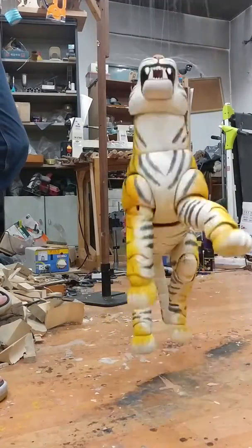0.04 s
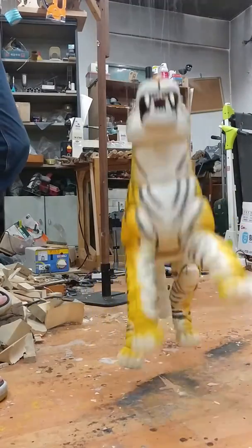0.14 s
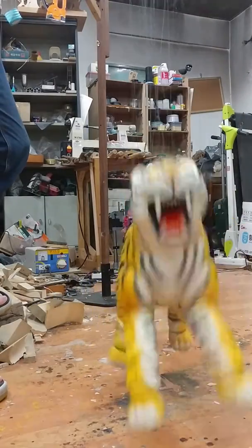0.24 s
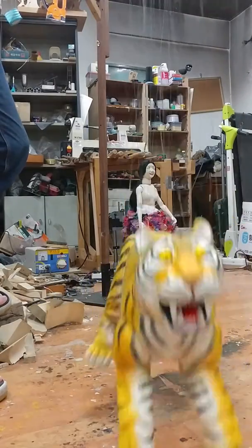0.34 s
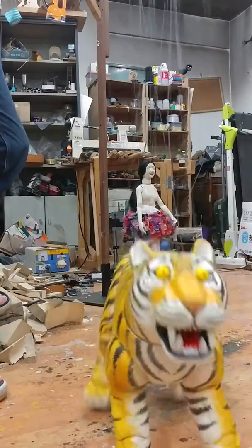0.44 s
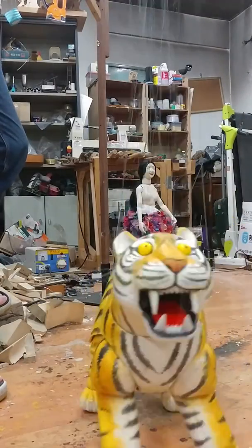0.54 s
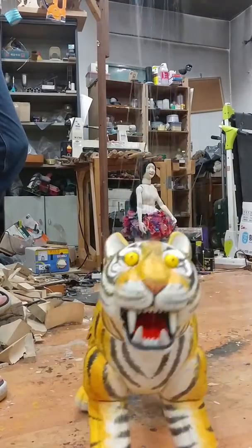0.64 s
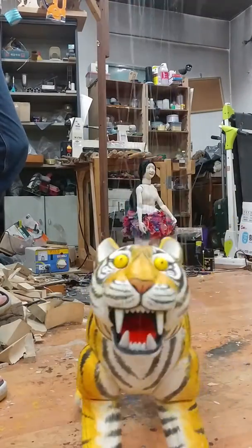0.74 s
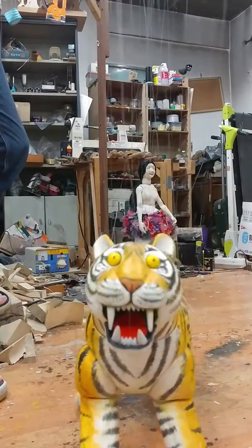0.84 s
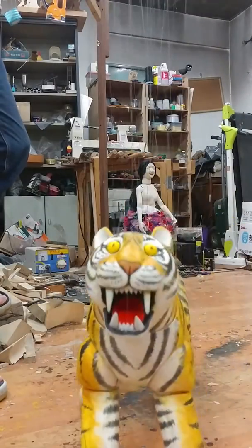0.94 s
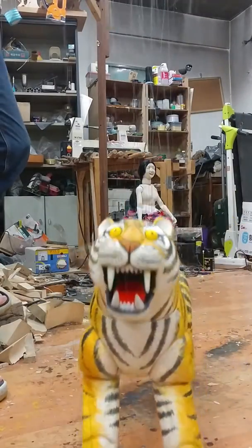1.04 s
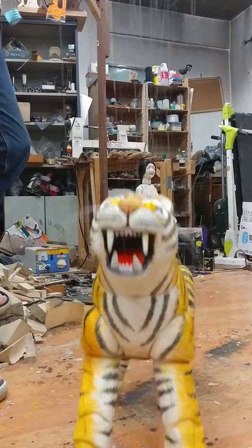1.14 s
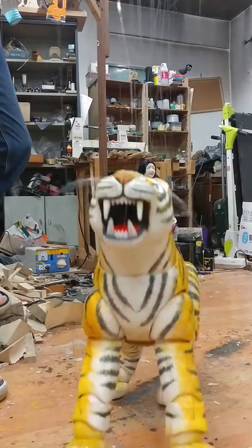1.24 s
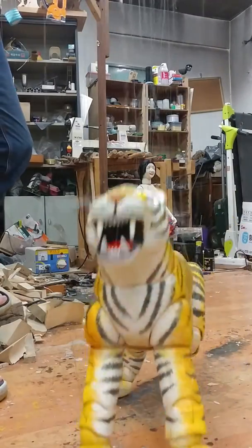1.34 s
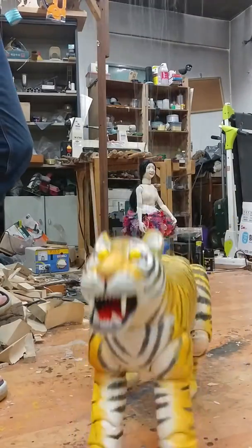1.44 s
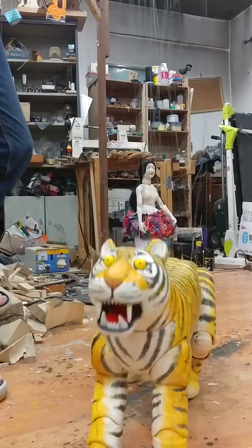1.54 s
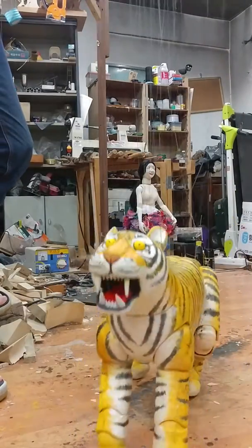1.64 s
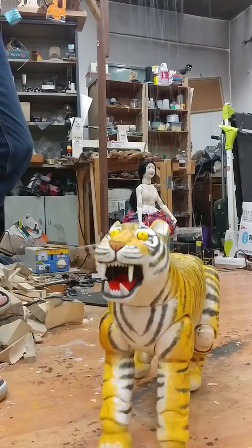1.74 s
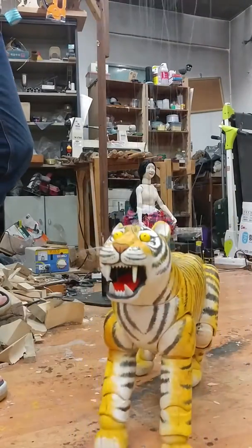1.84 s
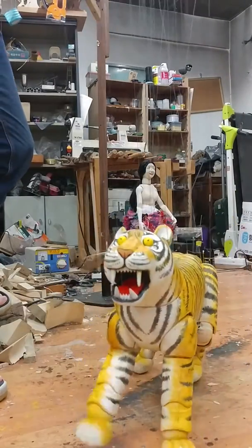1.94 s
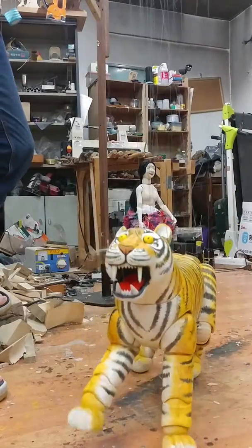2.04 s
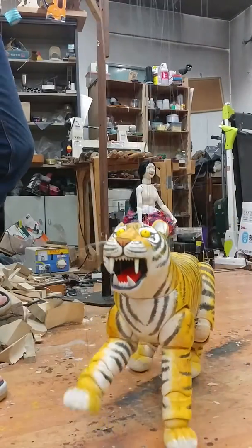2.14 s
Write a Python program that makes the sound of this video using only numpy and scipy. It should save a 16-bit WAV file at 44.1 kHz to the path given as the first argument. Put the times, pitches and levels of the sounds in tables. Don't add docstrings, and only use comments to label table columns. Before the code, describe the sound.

Carved wooden limbs knock and clack in a fast irregular burst, pause, then one sharp double clack

```python
import sys
import numpy as np
from scipy import signal
from scipy.fft import rfft, irfft, next_fast_len
from scipy.io import wavfile

SR = 44100
rng = np.random.default_rng(int(sys.argv[2]) if len(sys.argv) > 2 else 0)


def put_to_file(sound):
    columns = np.atleast_2d(sound).T
    safe = np.clip(columns, -1, 1)
    whole_steps = np.round(safe * 32767)
    wavfile.write(sys.argv[1], SR, whole_steps.astype(np.int16))


def makeup_ratio(level_db):
    decades = np.asarray(level_db, float) / 20
    return 10 ** decades


N = 97020

# start_s, peak_db, pitch_hz, t60_s
BODY_THUMPS = [(0.0, -38.5, 300, 0.099), (0.18, -53.5, 353, 0.071), (0.233, -16, 295, 0.057),
               (0.246, -25, 290.5, 0.084), (0.319, -26.5, 313.5, 0.091), (0.349, -25, 327, 0.072),
               (0.403, -16, 285, 0.045), (0.414, -18, 189, 0.13), (0.4432, -10, 328.7, 0.05),
               (0.4516, -12.5, 387, 0.043), (0.4565, -12, 216.5, 0.03), (0.516, -19.5, 219, 0.14),
               (0.556, -11.5, 356.6, 0.061), (0.6235, -25, 300, 0.032), (.630, -31.5, 342, 0.12),
               (0.655, -19, 300, 0.022), (.669, -29.5, 446, .05), (0.6946, -24.5, 380, 0.029),
               (0.709, -43.5, 346, 0.07), (0.78, -29.5, 197, 0.035), (0.899, -44.5, 313, 0.082),
               (1.197, -43, 378.5, 0.047), (1.452, -38, 399, 0.11), (1.4682, -24.5, 228, 0.099),
               (1.4919, -9.5, 214, 0.051), (1.5121, -19.5, 202, 0.099), (1.5681, -17, 347.4, 0.053),
               (1.689, -34.5, 205, 0.044), (1.756, -45.5, 384, 0.16), (1.801, -42, 406, 0.098),
               (1.915, -58.5, 397, 0.21), (1.955, -46.5, 403, 0.096), (1.992, -47, 420, 0.059),
               (2.007, -43.5, 421.5, 0.035)]
THUMP_RISE_S, PARTNER_RATIO, PARTNER_DB = 0.001, 1.765, -10
BODY_LOW_HZ = 111

# start_s, peak_db, pitch_hz, crack_db
LIMB_CLACKS = [(.046, -35, 976, -7.5), (0.277, -13, 1474, -35.5), (.216, -42.5, 3320, -24),
               (0.226, -38.5, 880, 1), (0.265, -19.5, 1510, -16), (.274, -18.5, 2780, -6),
               (.3215, -24, 900, 3), (0.349, -20.5, 3600, -14), (.372, -12.5, 973, -9),
               (.4045, -10.5, 2226, -5.5), (0.417, -13, 2047, -27), (.430, -48, 1706, -10.5),
               (0.448, -23, 3040, 3), (.484, -11.5, 1390, -50), (.494, -16, 2930, -49),
               (.518, -12.5, 843, -17), (.541, -41, 3080, -33), (.559, -15, 1683, -23),
               (0.666, -23, 1400, -20.5), (.668, -52, 3340, -31.5), (0.7139, -33.5, 730, -12.5),
               (.880, -34, 790, -30.5), (.898, -31.5, 832, -13), (1.703, -37, 3000, -10.5),
               (1.452, -31.5, 740, -28), (1.469, -24.5, 3280, 5), (1.481, -22.5, 2640, -2.5),
               (1.490, -10, 995, 0), (1.52, -29.5, 3860, 9.5), (1.691, -33.5, 3793, -9)]
CLACK_RISE_S, MAIN_T60_S, MAIN_DB = 0.00095, 0.022, -5.5
CRACK_FALL_S, CRACK_DB, CRACK_HZ = 0.0016, 6.5, 3000
SPLINTER_T60_S, SPLINTER_DB, SPLINTER_LOW_HZ, SPLINTER_TOP_HZ = 0.038, -4, 450, 5873
SOFT_REACH, SOFT_SLOPE = 5, 0.23
HARD_DB = -24.5
LAG_SPREAD_S = 0.00069

# frequency_hz, level_db (per Hz)
WOOD_COLOUR = [(240, -32), (400, -11.5), (697, -10), (949, -7), (1710, -16.5), (2880, -16.5), (6950, -32.5),
               (9040, -27), (16000, -42)]
NEAR_DB, NEAR_OCTAVES = 5, 0.9

# start_s, peak_db, pitch_hz, t60_s
LIMB_TAPS = [(.2655, -43, 1400, 0.036), (.273, -23.5, 1358, 0.13), (.2735, -30, 2853, 0.2),
             (.279, -33, 1465, 0.044), (.289, -38, 1360, 0.036), (.298, -32.5, 1470, 0.019),
             (.305, -39, 3010, 0.038), (.3205, -12.5, 832, 0.015), (.322, -29.5, 2834, 0.051),
             (.352, -49, 600, 0.025), (.360, -33, 2737, 0.11), (.3718, -21.5, 885, 0.0063),
             (.3735, -22, 2826, 0.03), (.4045, -13, 2212, 0.03), (.416, -24.5, 4014, 0.034),
             (.430, -38, 3000, 0.016), (.449, -35.5, 3960, 0.018), (.485, -30, 3800, 0.019),
             (.4932, -28, 697, 0.031), (.507, -36, 3110, 0.0115), (.529, -28.5, 1320, 0.018),
             (.5295, -45, 3560, 0.016), (.540, -34, 3080, 0.015), (.562, -22, 3050, 0.009),
             (1.1965, -55, 700, 0.01), (.6662, -28, 1720, 0.0085), (.6665, -25, 1010, 0.016),
             (.667, -44.5, 3370, 0.051), (.678, -39, 1575, 0.034), (.689, -42, 3370, 0.036),
             (.7135, -34, 590, 0.019), (.7137, -40, 2130, 0.022), (.7155, -37.5, 2910, 0.018),
             (.727, -56, 3000, .02), (.898, -45.5, 880, 0.036), (.910, -54.5, 690, 0.025),
             (.917, -44.5, 442, 0.06), (.930, -47.5, 950, 0.042), (1.4686, -20, 2470, 0.011),
             (1.480, -18, 2960, 0.013), (1.4895, -14, 3540, 0.013), (1.4945, -17, 3030, 0.013),
             (1.501, -32, 4040, 0.02), (1.6908, -40, 2800, 0.033), (1.692, -44, 3716, .04),
             (1.956, -56.5, 5700, 0.082), (1.714, -49.5, 2890, .04), (1.81, -51.5, 5260, .08)]
TAP_RISE_S, TAP_LAG_S = 0.00059, 0.00011
# pitch_ratio, level_db, t60_share
TAP_NEIGHBOURS = [
    (.83, -11.5, 0.35),
    (1.07, -2, 0.62),
    (1.24, -4, 0.66),
    (1.898, -9, 0.32),
]

# start_s, length_s, level_db
JOINT_SHAKES = [(0, 0.025, -48.5), (.045, 0.025, -56), (.225, 0.13, -38), (.265, 0.19, -38),
                (.405, 0.07, -31.5), (.485, 0.1, -33.5), (.59, 0.11, -51.5), (.9, 0.039, -47),
                (1.0, 0.29, -67.5), (1.469, 0.032, -46.5), (1.49, 0.071, -30), (1.6, 0.045, -45),
                (1.69, 0.051, -54.5), (1.755, 0.083, -58), (1.94, 0.089, -68.5)]
SHAKE_RISE_S, SHAKE_SAG_DB, SHAKE_FALL_S = 0.0013, -0.5, 0.0051
TICKS_PER_S, TICK_SPREAD_DB, TICK_T60_S, TICK_HZ, TICK_KINDS = 280, 4.5, 0.017, 2810, 24
BODY_SHAKE_DB, DULL_HZ, DULL_SLOPE = -7, 1884, 0.8
# pitch_hz, width_hz, level_db
BODY_MODES = [
    (185.2, 73, -16.5),
    (226, 13.6, 19),
    (300, 23, 18),
    (368, 8.5, 11.5),
]

# start_s, level_db
BOARD_SWAYS = [
    (0.032, -53),
    (0.259, -39.5),
    (0.438, -63.5),
    (0.628, -42.5),
    (.85, -45.5),
    (1.437, -36.5),
    (1.582, -45),
    (1.801, -45),
    (1.917, -48.5),
]
SWAY_HZ, SWAY_RISE_S, SWAY_T60_S = 52.9, 0.02, 0.46

# start_s, length_s, level_db
BRUSH_STROKES = [(.045, 0.068, -66), (.18, 0.19, -65.5), (.27, 0.31, -48), (.49, 0.16, -53.5),
                 (.9, 0.23, -69.5), (1.39, 0.16, -63), (1.49, 0.06, -44), (1.685, 0.058, -64),
                 (1.745, 0.033, -57.5), (1.805, 0.033, -58.5), (1.93, 0.064, -65), (2.14, 0.019, -73.5)]
STROKE_RISE_S, STROKE_SAG_DB, STROKE_FALL_S = 0.003, -1, 0.035
GRAINS_PER_S, GRIT_DB = 6000, 4.5
# frequency_hz, level_db (per Hz)
SCUFF_COLOUR = [(880, -34), (1500, -3.5), (4780, -4.5), (5280, -2), (7100, -11), (8080, -6.5), (10300, -12),
                (13400, -12), (16000, -24.5)]

# frequency_hz, t60_s
ROOM_DECAY = [(100, 0.15), (300, 0.28), (1000, 0.25), (3000, 0.26), (8000, 0.31), (16000, 0.38)]
ROOM_DB, ROOM_GAP_S, THUMP_ROOM_DB = -3, 0.004, -2.5

# frequency_hz, level_db (per Hz)
AIR_COLOUR = [(15, -31), (40, -2.5), (59, 0), (363, -10.5), (1890, -27), (9320, -30), (10700, -36.5),
              (12900, -21.5), (16000, -30.5)]
AIR_DB, HUM_DB, HUM_HZ, HUM_WIDTH_HZ = -63, -65, 50.3, 13

# frequency_hz, likeness (0 to 1)
LIKENESS = [(100, 0.74), (400, 0.85), (700, 0.78), (1100, 0.04), (16000, 0.025)]
# frequency_hz, left_minus_right_db
PORT_TILT = [(60, 4.5), (130, -5), (290, 2.5), (1400, -2), (3100, 3.5), (6000, 1), (8500, 13.5),
             (12000, -0.5)]
LOW_CUT_HZ, TOP_HZ = 36, 15700


def thumps():
    out, t = np.zeros(N), np.arange(0, .25, 1 / SR)
    rise = 1 - np.exp(-(t / THUMP_RISE_S) ** 2)
    for s, db, hz, t60 in BODY_THUMPS:
        partner = ring(hz * PARTNER_RATIO, t60 * .5)
        blow = ring(hz, t60) + makeup_ratio(PARTNER_DB) * partner
        add(out, s, -makeup_ratio(db) * rise * blow)
    return colour(out, lambda hz: 1 / (1 + (BODY_LOW_HZ / (hz + 1)) ** 4))


def clacks():
    out, cracks, t = np.zeros((2, N)), np.zeros((2, N)), np.arange(0, .1, 1 / SR)
    lucks = rng.random((len(LIMB_CLACKS), 40, 3))
    noises = rng.standard_normal((len(LIMB_CLACKS), 2, len(t)))
    rise, crack_fall = 1 - np.exp(-t / CLACK_RISE_S), np.exp(-t / CRACK_FALL_S)
    for (s, db, hz, crack_db), luck, noise in zip(LIMB_CLACKS, lucks, noises):
        knock = makeup_ratio(MAIN_DB) * ring(hz, MAIN_T60_S, .1)
        knock = knock + makeup_ratio(SPLINTER_DB) * splinters(luck, SPLINTER_T60_S, hz)
        reach_hz = SOFT_REACH * hz * makeup_ratio(SOFT_SLOPE * (db - HARD_DB))
        knock = signal.lfilter(*signal.butter(2, min(reach_hz, SR / 2.2), fs=SR), knock)
        for ear in range(2):
            at = s + ear * LAG_SPREAD_S * (luck[0, 2] - .2)
            add(out[ear], at, makeup_ratio(db) * rise * knock)
            add(cracks[ear], at, makeup_ratio(db + crack_db + CRACK_DB) * noise[ear] * crack_fall)
    return out + colour(cracks, lambda hz: makeup_ratio(read(SCUFF_COLOUR, hz)) / np.sqrt(1 + (hz / CRACK_HZ) ** 2))


def splinters(luck, t60, near_hz):
    pitches = SPLINTER_LOW_HZ * (SPLINTER_TOP_HZ / SPLINTER_LOW_HZ) ** luck[:, 0]
    levels = read(WOOD_COLOUR, pitches)
    levels = levels + NEAR_DB * np.exp(-(np.log2(pitches / near_hz) / NEAR_OCTAVES) ** 2)
    out = 0
    for hz, db, (_, side, length) in zip(pitches, levels, luck):
        out = out + np.sign(side - .5) * makeup_ratio(db) * np.sqrt(hz) * ring(hz, t60 * (.5 + length), .1)
    return out / abs(out).max()


def taps():
    out, t = np.zeros((2, N)), np.arange(0, .1, 1 / SR)
    rise = 1 - np.exp(-t / TAP_RISE_S)
    for k, (s, db, hz, t60) in enumerate(LIMB_TAPS):
        tap = ring(hz, t60, .1)
        for ratio, near_db, share in TAP_NEIGHBOURS:
            tap = tap + makeup_ratio(near_db) * ring(hz * ratio, t60 * share, .1)
        for ear in range(2):
            add(out[ear], s + ear * (-1) ** k * TAP_LAG_S, -makeup_ratio(db) * rise * tap)
    return out


def chatter():
    spread = makeup_ratio(TICK_SPREAD_DB * np.minimum(rng.exponential(1, N), 3))
    ticks = spread * (rng.random(N) < TICKS_PER_S / SR)
    kind, luck = rng.integers(0, TICK_KINDS, (2, N)), rng.random((TICK_KINDS, 12, 3))
    limbs = np.zeros((2, N))
    for k in range(TICK_KINDS):
        knock = splinters(luck[k], TICK_T60_S, TICK_HZ)
        limbs += signal.oaconvolve(ticks * (kind == k), knock[None], axes=1)[:, :N]
    limbs = evened(paired(*limbs))
    hollow = sum(makeup_ratio(db) * ring(hz, 2.9 / width) for hz, width, db in BODY_MODES)
    body = signal.oaconvolve(ticks * rng.standard_normal(N), hollow)[:N]
    shake = bouts(JOINT_SHAKES, SHAKE_RISE_S, SHAKE_SAG_DB, SHAKE_FALL_S)
    dull = colour(limbs, lambda hz: 1 / (1 + (hz / DULL_HZ) ** 4))
    hard = np.minimum(shake / makeup_ratio(HARD_DB), 1) ** DULL_SLOPE
    return shake * (dull + hard * (limbs - dull) + makeup_ratio(BODY_SHAKE_DB) * evened(body))


def sways():
    out, t = np.zeros(N), np.arange(0, .25, 1 / SR)
    rise = np.clip(t / SWAY_RISE_S, 0, 1) ** 2
    fade = np.cos(2 * np.pi * t)
    for s, db in BOARD_SWAYS:
        add(out, s, makeup_ratio(db) * rise * ring(SWAY_HZ, SWAY_T60_S) * fade)
    return out


def scuff():
    noise = rng.standard_normal((2, N))
    grit = makeup_ratio(GRIT_DB * np.minimum(rng.exponential(1, (2, N)), 3))
    grains = noise * (.5 + grit * (rng.random((2, N)) < GRAINS_PER_S / SR))
    bright = evened(colour(grains, lambda hz: makeup_ratio(read(SCUFF_COLOUR, hz))))
    return bouts(BRUSH_STROKES, STROKE_RISE_S, STROKE_SAG_DB, STROKE_FALL_S) * bright


def bouts(rows, rise_s, sag_db, fall_s):
    t, power = np.arange(N) / SR, 0
    for s, length, db in rows:
        held = np.clip((t - s) / length, 0, 1)
        rise = np.clip((t - s) / rise_s, 0, 1)
        fall = np.exp(-np.maximum(t - s - length, 0) / fall_s)
        power = power + (makeup_ratio(db + sag_db * held) * rise * fall) ** 2
    return np.sqrt(power)


def room(x):
    taps, gap = np.zeros((2, SR // 2)), 22
    starts = np.arange(round(ROOM_GAP_S * SR), SR // 2 - gap, gap)
    places = starts + rng.integers(0, gap, (2, len(starts)))
    np.put_along_axis(taps, places, rng.choice([-1., 1.], (2, len(starts))), 1)
    hz, t, z = signal.stft(paired(*taps), SR, nperseg=256)
    decay = makeup_ratio(-60 * t / read(ROOM_DECAY, hz)[:, None])
    tail = signal.istft(z * decay, SR, nperseg=256)[1]
    return signal.fftconvolve(x[None], tail / np.linalg.norm(tail[0]), axes=1)[:, :N]


def air():
    a, b, c = rng.standard_normal((3, N))
    hiss = colour(paired(a, b), lambda hz: makeup_ratio(read(AIR_COLOUR, hz)))
    hum = colour(c, lambda hz: 1 / (1 + ((hz - HUM_HZ) / HUM_WIDTH_HZ) ** 4))
    return makeup_ratio(AIR_DB) * evened(hiss) + makeup_ratio(HUM_DB) * evened(hum)


def ring(hz, t60, length=.25):
    t = np.arange(0, length, 1 / SR)
    return makeup_ratio(-60 * t / t60) * np.sin(2 * np.pi * hz * t)


def add(mix, s, sound):
    part = mix[max(round(s * SR), 0):][:len(sound)]
    part += sound[:len(part)]


def evened(x):
    return x / np.sqrt(np.mean(x ** 2) + 1e-20)


def read(points, hz):
    f, value = np.transpose(points)
    return np.interp(np.log(hz + 1), np.log(f + 1), value)


def colour(x, gain):
    size = next_fast_len(x.shape[-1] + 4096)
    return irfft(rfft(x, size) * gain(np.fft.rfftfreq(size, 1 / SR)), size)[..., :x.shape[-1]]


def paired(a, b):
    same = lambda hz: np.clip(read(LIKENESS, hz), 0, 1)
    return np.array([a, colour(a, same) + colour(b, lambda hz: np.sqrt(1 - same(hz) ** 2))])


def scene():
    low = thumps()
    limbs = clacks() + chatter() + taps()
    echo = room(limbs[0] + makeup_ratio(THUMP_ROOM_DB) * low)
    return low + limbs + makeup_ratio(ROOM_DB) * echo + sways() + scuff() + air()


def top_cut(x):
    return signal.sosfilt(signal.butter(12, 16460, fs=SR, output="sos"), x)


def record(dry):
    def port(hz):
        sides = makeup_ratio(np.array([[.5], [-.5]]) * read(PORT_TILT, hz))
        return sides / (1 + (LOW_CUT_HZ / (hz + 1)) ** 6) * (hz < TOP_HZ)
    return top_cut(colour(dry, port))


dry = scene()
out = record(dry)
put_to_file(out)
```